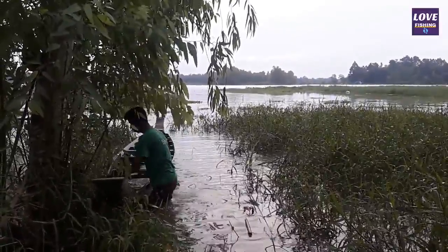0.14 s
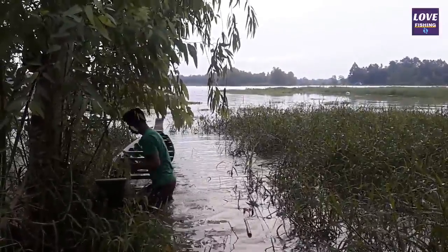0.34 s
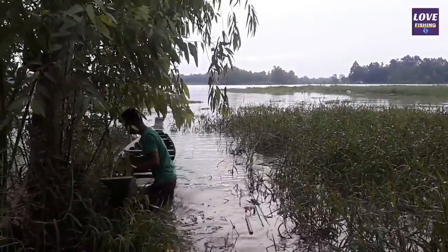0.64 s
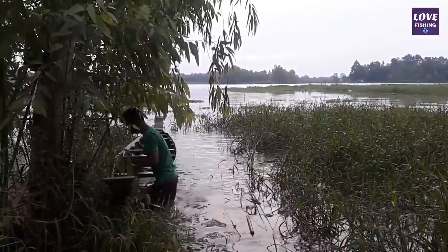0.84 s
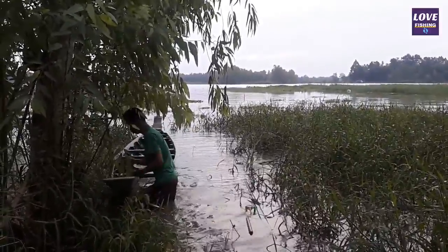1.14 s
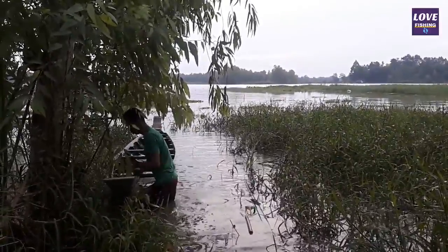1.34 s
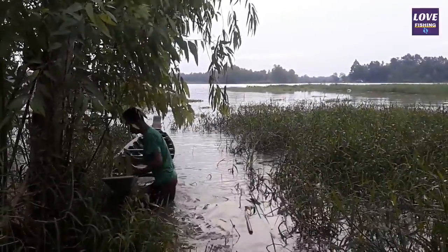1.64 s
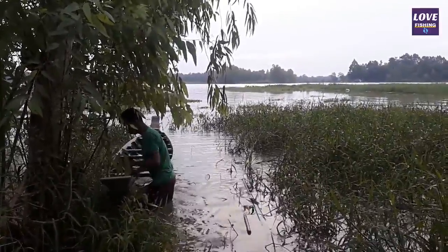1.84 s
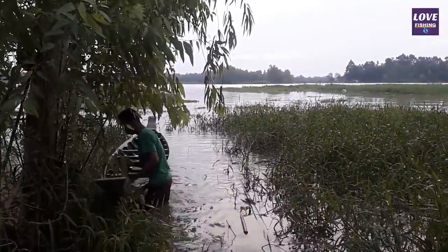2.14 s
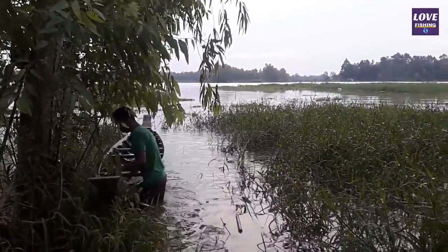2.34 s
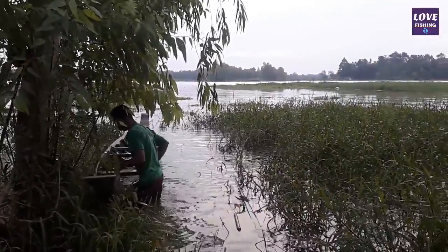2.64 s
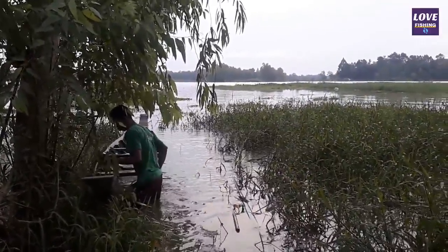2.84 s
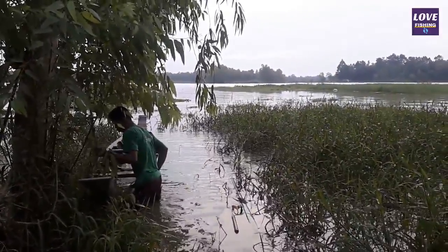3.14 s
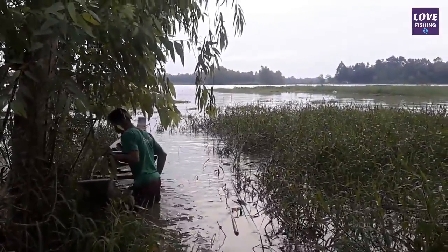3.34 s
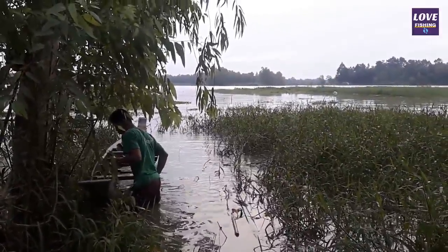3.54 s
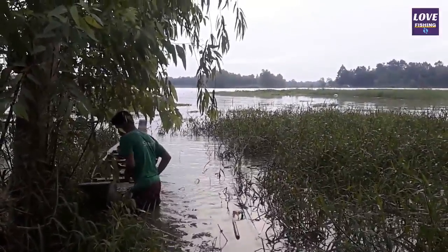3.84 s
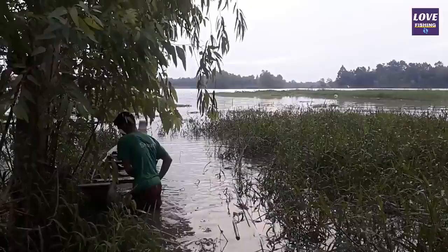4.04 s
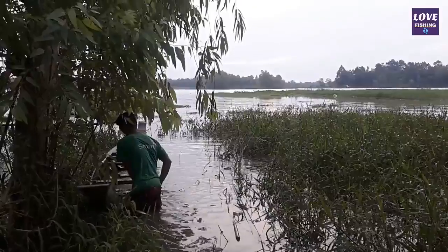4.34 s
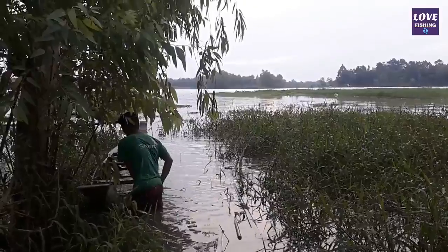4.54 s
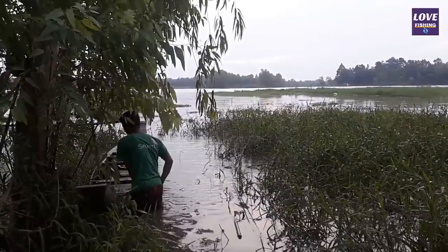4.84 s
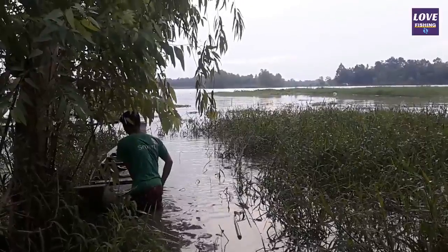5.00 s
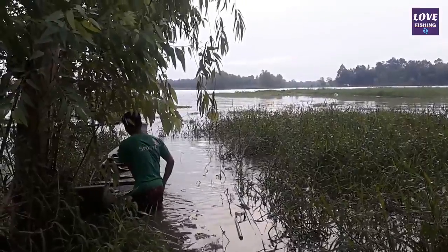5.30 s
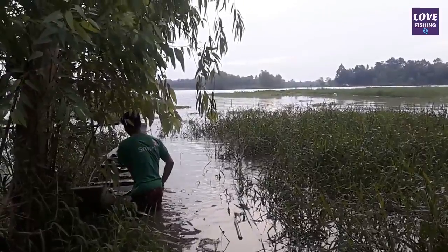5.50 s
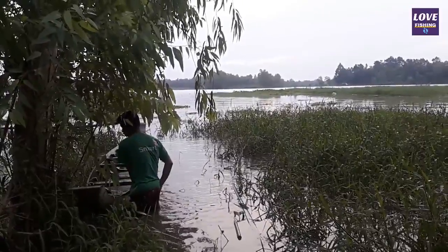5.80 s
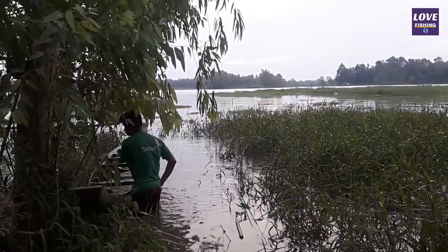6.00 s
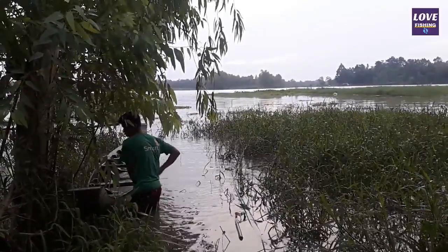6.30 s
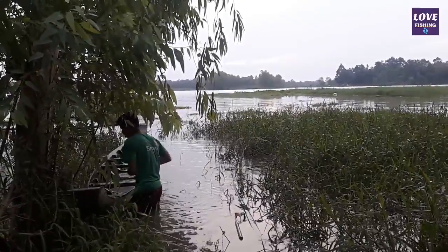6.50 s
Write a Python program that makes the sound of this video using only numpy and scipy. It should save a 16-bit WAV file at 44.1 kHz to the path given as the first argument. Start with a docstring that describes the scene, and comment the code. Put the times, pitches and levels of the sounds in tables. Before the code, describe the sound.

A few light plops and swishes open, then irregular woody knocks pile up quickly with thin metallic chain shimmer and low hull thuds. After a sparse gap, a second short clattering burst follows and dies. The rest is quiet: lake air, thin steady insect trill, small water movements, reed brushing and a few faint dull bumps. Open outdoor stereo with a very short tail from hull and bushes.

```python
'''Chained net lowered into a wooden boat

A man standing in a lake lowers what is probably a cast net into a wooden boat. Its sinkers knock, as blows
on resonances of boards and hull; its chain slides into a heap, as dense clicks through ringing steel links.
Filtered noise and sparse contacts make the net's rustle, the water, the reeds, the air and the insects in
the bank's bushes; climbing sines make drips, air pockets and the ring of light knocks. Hull and bushes
answer with a short noise tail.'''
import sys
import numpy as np
from scipy import signal
from scipy.fft import rfft, irfft, next_fast_len
from scipy.io import wavfile
from scipy.ndimage import uniform_filter1d, map_coordinates

SR = 44100
rng = np.random.default_rng(int(sys.argv[2]) if len(sys.argv) > 2 else 0)


def unload_wav(signal):
    """Save mono or channel-first audio to the path in sys.argv[1] as 16-bit WAV at rate SR, clipped to [-1, 1]."""
    wavfile.write(
        sys.argv[1],
        SR,
        np.round(np.clip(np.atleast_2d(signal).T, -1, 1) * 32767).astype(np.int16),
    )


N = 293706

# Pour of the chain over the boards. Each row: time in seconds, patter and hull rumble in relative dB.
POUR = [(0.0, -72, -72), (0.34, -66.5, -50.5), (0.39, -42.5, -43.5), (0.62, -51, -41), (0.75, -42, -36),
        (1.03, -47.5, -43.5), (1.16, -40.5, -42.5), (1.45, -39, -43.5), (1.7, -45.5, -49.5),
        (1.85, -37, -37), (2.201, -44, -61.5), (2.33, -39, -47.5), (2.58, -48, -46), (2.76, -65.5, -67),
        (3.45, -57, -53), (3.72, -39, -43), (3.911, -48.5, -56), (3.992, -67, -54), (4.15, -95, -81)]
# Resonances of the hull. Each row: centre in Hz, width in Hz, relative level in dB.
HULL_MODES = [(134, 360, -11), (324.8, 83, 1), (361.5, 88, 5.5), (437, 91, -5.5)]
# Lower resonances of the boards. Each row: centre in Hz, width in Hz, relative level in dB.
BOARD_MODES = [(619, 84, -4), (666, 56, 0.5), (748, 85, -3), (981, 148, -1.5), (1282, 150, -5),
               (1320, 100, -2), (1640, 230, -8.5)]
# Upper resonances of the boards. Each row: centre in Hz, width in Hz, relative level in dB.
SNAP_MODES = [(1922, 262, 0), (2514, 100, 2.5), (3020, 610, -3.5), (3304, 490, -3.5), (4247, 1300, -14)]
# Colour of the links' clicks. Each row: frequency in Hz, relative spectral density in dB.
CLICK_SPECTRUM = [(3000, -23.5), (5000, -18.5), (7500, -22), (9000, -16.5), (10500, -9.5), (11300, -15),
                  (12200, -19.5), (13200, -7.5), (14500, -0.5), (15100, -16.5), (15600, -0.5),
                  (16200, -31.5)]
# Left-right likeness of sound from the boat. Each row: frequency in Hz, correlation (-1 to 1).
BOAT_ALIKE = [(300, 1), (640, 1), (1000, 0.96), (2000, 0.085), (3000, 0.58), (6000, 0.085)]
# Left-right likeness of the air and the hum. Each row: frequency in Hz, correlation (-1 to 1).
AIR_ALIKE = [(60, 0.92), (150, 0.89), (380, 0.69), (950, -0.2), (2380, -0.16), (6000, 0.04), (15000, -0.1)]


def amp(db):
    """Decibels to gain."""
    return 10 ** (np.asarray(db) / 20)


def unit(x):
    """Scaled to rms 1."""
    return x / np.sqrt(np.mean(x ** 2) + 1e-20)


def along(points, hz):
    """Interpolates (Hz, value) points on a log-frequency axis."""
    f, v = np.transpose(points)
    return np.interp(np.log(hz + 1), np.log(f + 1), v)


def levels(rows):
    """One gain per sample for each dB column; -120 dB outside the rows."""
    s, *cols = np.transpose(rows)
    t = np.arange(N) / SR
    return [amp(np.interp(t, s, c, left=-120, right=-120)) for c in cols]


def wobble(rate):
    """A smooth random curve, rate knots a second."""
    knots = rng.standard_normal(int(N * rate / SR) + 4)
    return map_coordinates(knots, [np.arange(N) * rate / SR])


def pan(left_db):
    """Two channel gains of mean power 1, left over right by left_db."""
    return unit(amp([[left_db / 2], [-left_db / 2]]))


def filtered(x, response):
    """x times a complex response of frequency."""
    size = x.shape[-1]
    m = next_fast_len(size + SR // 40, real=True)
    return irfft(rfft(x, m) * response(np.fft.rfftfreq(m, 1 / SR)), m)[..., :size]


def ringing(x, modes):
    """x through parallel resonances of alternating sign."""
    def response(f):
        total = 0
        for k, (centre, width, db) in enumerate(modes):
            damping = 1j * f * width
            total = total + (-1) ** k * amp(db) * damping / (centre * centre - f * f + damping)
        return total
    return filtered(x, response)


def edge(x, hz, kind, order):
    """A causal Butterworth filter."""
    return signal.sosfilt(signal.butter(order, hz, kind, fs=SR, output="sos"), x)


def spread(pair, alike):
    """Two unrelated signals become left and right with the given likeness."""
    def mid_side(hz):
        turn = np.arccos(np.clip(along(alike, hz), -1, 1)) / 2
        return np.array([np.cos(turn), np.sin(turn)])
    mid, side = filtered(pair, mid_side)
    return np.array([mid + side, mid - side])


def coloured(x, spectrum):
    """x shaped by the given spectrum, at rms 1."""
    return unit(filtered(x, lambda hz: amp(along(spectrum, hz))))


def patchy(x, depth_db):
    """x with its colour shifting at random from moment to moment, at rms 1."""
    z = signal.stft(x, nperseg=512)[2]
    field = rng.standard_normal(z.shape[1:])
    field = uniform_filter1d(uniform_filter1d(field, 7, 0), 9, 1)
    return unit(signal.istft(z * amp(depth_db * unit(field)), nperseg=512)[1][:, :N])


def noise():
    """White noise, unrelated in the two channels."""
    return rng.standard_normal((2, N))


def contacts(rate, scatter_db):
    """Tiny impacts of uneven size at random moments, rate a second."""
    sizes_db = scatter_db * np.clip(rng.standard_normal(N), -2, 2)
    return noise() * (rng.random(N) < rate / SR) * amp(sizes_db)


def add(track, s, sound):
    """Mixes a sound in at s seconds."""
    part = track[:, max(round(s * SR), 0):][:, :sound.shape[1]]
    part += sound[:, :part.shape[1]]


def struck_at_random(modes, vary_db):
    """Each blow drives the modes with other strengths."""
    return np.array(modes) + rng.standard_normal((len(modes), 1)) * [0, 0, vary_db]


def air(level_db=-60.5):
    """The low, even rush of the open lake: noise with a slight slow swell."""
    # Each row: frequency in Hz, relative spectral density in dB.
    air_spectrum = [(20, -33), (45, -7), (75, -1), (130, 1.5), (280, -5.5), (410, -8), (540, -8.5),
                    (1000, -16.5), (2200, -19), (3800, -25.5), (5500, -30.5), (7500, -31), (9700, -28.5),
                    (15500, -35.5)]
    swell_db = 0.7 * wobble(4)
    rush = coloured(spread(noise(), AIR_ALIKE), air_spectrum)
    return amp(level_db + swell_db) * rush * pan(-1.5)


def insects(chirp_per_s=4.4, chirp_db=0.8, trill_per_s=31, trill_db=1):
    """Many far insects merge into one narrow noise band, pulsing slowly and trilling fast."""
    # Drone. Each row: time in seconds, level in dB.
    drone_levels = [(0, -61.5), (2.8, -59), (4.2, -61.5), (4.75, -64), (5.65, -62), (5.74, -56.5),
                    (5.83, -63.5), (6.66, -63)]
    # Each row: frequency in Hz, relative spectral density in dB.
    insect_spectrum = [(3800, -20), (4250, -9.5), (4500, 1), (4760, 6.5), (4950, -0.5), (5250, -12),
                       (6200, -57)]
    drone, = levels(drone_levels)
    beat = lambda per_s: np.sin(2 * np.pi * per_s * np.arange(N) / SR + wobble(0.99))
    shimmer_db = chirp_db * beat(chirp_per_s) + trill_db * beat(trill_per_s) + wobble(60)
    return drone * amp(shimmer_db) * coloured(noise(), insect_spectrum) * pan(-1.5)


def wading(lapping_db=-73, water_db=0, reeds_db=-2, sag_db_per_s=40, calm_t60_s=0.3):
    """Water laps, swishes round his legs and reeds brush past: contacts swelling with each movement."""
    # Movements. Each row: start, rise and length in seconds, water and reeds in relative dB.
    movements = [(0.033, 0.025, 0.18, -59, -57.5), (0.227, 0.025, 0.028, -55, -48.5),
                 (4.378, .025, 0.059, -86, -58), (4.42, .07, 0.14, -65.5, -63),
                 (4.884, 0.12, 0.49, -67, -64), (5.33, 0.074, 0.056, -73.5, -65),
                 (5.869, .05, 0.058, -60, -59), (5.975, .12, 0.13, -56.5, -60.5),
                 (6.104, .05, 0.19, -74.5, -60.5), (6.376, .025, 0.22, -58.5, -65),
                 (6.45, 0.055, 0.094, -74, -62)]
    # Water. Each row: frequency in Hz, relative spectral density in dB.
    water_spectrum = [(200, -21), (400, -41.5), (700, -3.5), (1300, -3.5), (2100, 1), (3300, -3.5),
                      (5000, -27.5), (9000, -38)]
    # Reeds. Each row: frequency in Hz, relative spectral density in dB.
    reed_spectrum = [(2500, -5), (4000, 6.5), (5600, 4.5), (7000, -5.5), (10000, -5), (15000, -19)]
    water, reeds = np.full(N, amp(lapping_db)), np.zeros(N)
    for s, rise, length, swish_db, brush_db in movements:
        t = np.maximum(np.arange(N) / SR - s, 0)
        calm_db = -60 * np.maximum(t - length, 0) / calm_t60_s
        move = np.minimum(t / rise, 1) * amp(-sag_db_per_s * t + calm_db)
        water = np.hypot(water, amp(swish_db) * move)
        reeds = np.hypot(reeds, amp(brush_db) * move)
    splashes = coloured(contacts(rate=2500, scatter_db=3), water_spectrum)
    lap = amp(2 * wobble(30)) * patchy(splashes, depth_db=4)
    brush = coloured(contacts(rate=9000, scatter_db=3), reed_spectrum)
    return amp(water_db) * water * lap + amp(reeds_db) * reeds * brush


def tumble(patter_db=-6, snap_db=-3, rumble_db=-9, soft_hz=5080):
    """Lighter links patter on the boards: random contacts excite board and hull resonances."""
    patter, rumble = levels(POUR)
    taps = spread(contacts(rate=600, scatter_db=3), BOAT_ALIKE)
    clack = unit(ringing(taps, BOARD_MODES))
    snap = amp(snap_db) * unit(ringing(taps, SNAP_MODES)) * pan(7.7)
    wood = edge(unit(clack + snap), soft_hz, "low", order=3)  # wet wood dulls the blows
    hull = unit(edge(ringing(taps, HULL_MODES), 82, "high", order=2)) * pan(-1.3)
    return amp(patter_db) * patter * wood + amp(rumble_db) * rumble * hull


def mesh(level_db=-56.5, follows=0.4, usual_pour_db=-46.5):
    """The wet net rustles as long as the chain pours; follows is dB of rustle per dB of pour."""
    # Each row: frequency in Hz, relative spectral density in dB.
    mesh_spectrum = [(3000, -6.5), (4500, 5.5), (7000, -1.5), (10500, -2.5), (12000, -4.5), (14500, 4.5),
                     (16000, -12)]
    patter, _ = levels(POUR)
    flow = (patter / amp(usual_pour_db)) ** follows * amp(2.5 * wobble(25))
    rustle = patchy(coloured(contacts(rate=4000, scatter_db=3), mesh_spectrum), depth_db=4)
    return amp(level_db) * flow * rustle * pan(-4)


def drips(pitch_hz, pitch_spread, level_db, count, scatter_db=3, life_cycles=25, climb=0.098):
    """Drops off the wet net each ring a small bubble, a climbing sine with t60 of life_cycles periods."""
    t = np.arange(SR // 12) / SR
    out = np.zeros((2, N))
    s, patter_db, _ = np.transpose(POUR)
    chance = np.clip(rng.standard_normal((count, 3)), -2, 2)
    for at, (size, strength, side) in zip(rng.uniform(s[0], s[-1], count), chance):
        hz = pitch_hz * np.exp(pitch_spread * size)
        age = t * hz / life_cycles
        db = np.interp(at, s, patter_db) + level_db + scatter_db * strength
        bubble = (1 - np.exp(-t * hz)) * np.sin(2 * np.pi * hz * t * (1 + climb * age))
        add(out, at, amp(db - 60 * age) * bubble * pan(2 * side))
    return out


def sinkers(light_per_s=34, light_db=-3.5, light_thud_db=-9, light_snap_db=-3, scatter_db=2):
    """Sinker contacts at listed times, some of them follow-up hops, and light, dull ones at jittered moments
    following the pour."""
    # Listed contacts of sinkers, strong and faint; some are the follow-up hops of a sinker listed just before.
    # Each row: time in seconds, board clack, upper-mode snap and hull thud in relative dB.
    listed = [(0.172, -50, -56, -52), (0.25, -42.5, -44, -69), (0.366, -35.5, -35, -39.5),
              (0.375, -36.5, -32, -47), (0.395, -50, -56, -39), (0.408, -35, -31, -53),
              (0.422, -37, -32, -39), (0.456, -40, -44, -36.5), (0.484, -38, -44, -38),
              (0.497, -51, -53, -42), (0.519, -48, -57, -48), (0.535, -43.5, -49, -39),
              (0.56, -57, -45, -54), (0.576, -46.5, -38, -37.5), (0.622, -53, -70, -44.5),
              (0.655, -36.5, -42, -39), (0.676, -40, -63, -42.5), (0.699, -42, -36, -46),
              (0.708, -34.5, -30.5, -36), (0.737, -53, -46, -34), (0.756, -33.5, -28, -42),
              (0.779, -46, -35, -34.5), (0.798, -31.5, -30, -35.5), (0.824, -37, -37, -42),
              (0.853, -40, -44, -52), (0.9, -35.5, -63, -36), (0.951, -34, -28, -40),
              (0.997, -34, -36, -46), (1.006, -40.5, -45.5, -36), (1.058, -39.5, -30.5, -41),
              (1.065, -27.5, -27.5, -38), (1.087, -36, -35, -54), (1.114, -42, -39.5, -39),
              (1.134, -41.5, -26, -53), (1.142, -19, -20.5, -59), (1.156, -43.5, -28, -42.5),
              (1.2, -48, -47, -35), (1.226, -30, -37.5, -48), (1.251, -49.5, -40.5, -36.5),
              (1.274, -30.5, -60, -32.5), (1.287, -28, -24, -63), (1.297, -23, -18, -41),
              (1.302, -22.5, -44, -46.5), (1.335, -46, -41.5, -42.5), (1.367, -45, -30.5, -42),
              (1.378, -31, -32.5, -62), (1.401, -32, -28.5, -44.5), (1.412, -35, -44, -38.5),
              (1.433, -27.5, -41.5, -47), (1.466, -33.5, -38, -43.0), (1.477, -37, -37.5, -52),
              (1.523, -31, -35.5, -31.0), (1.568, -27.5, -35.5, -34), (1.595, -27.5, -34.5, -62),
              (1.61, -29, -41.5, -71), (1.626, -34.5, -31.5, -41.5), (1.683, -34.5, -43.5, -56.5),
              (1.708, -40, -61, -45), (1.749, -53.5, -67, -42.5), (1.765, -40, -51.5, -39),
              (1.781, -35.5, -41.5, -42), (1.8, -31.5, -38, -45), (1.823, -24.5, -25, -36.5),
              (1.83, -15.5, -16.5, -47.5), (1.843, -42, -18, -36), (1.9, -39, -34.5, -49),
              (1.932, -33, -50.5, -36.5), (1.989, -37.5, -39, -37), (2.002, -28, -29, -52),
              (2.01, -26, -26, -60), (2.025, -32.5, -24.5, -53), (2.035, -42, -60, -37.5),
              (2.084, -30, -39, -34.5), (2.121, -29, -34, -42.5), (2.135, -28.5, -31.5, -45),
              (2.15, -39.5, -36.5, -45.5), (2.185, -40, -40.5, -33), (2.236, -22.5, -26, -30.5),
              (2.255, -25.5, -30.5, -37.5), (2.265, -27, -18, -38), (2.277, -18.5, -22, -49),
              (2.284, -40.5, -36, -61), (2.31, -40, -55, -51), (2.348, -38, -37, -66),
              (2.362, -31.5, -33, -50), (2.373, -30, -29.5, -44), (2.412, -46, -56, -43.5),
              (2.516, -39, -35, -52), (2.526, -36.5, -47, -67), (2.541, -29, -29, -68),
              (2.579, -37.5, -37, -66), (2.672, -33.5, -38.5, -50), (2.702, -52, -69, -64),
              (2.821, -50, -57, -67.5), (2.874, -56, -55, -63), (3.168, -53, -63, -67),
              (3.107, -39, -46, -51), (3.205, -46, -39.5, -52.5), (3.277, -41.5, -46, -49),
              (3.353, -34.5, -40, -60), (3.38, -37, -40, -53), (3.399, -48, -50, -62),
              (3.434, -67, -65, -62), (3.484, -40, -52.5, -56), (3.51, -58, -77, -57),
              (3.534, -35, -49, -53), (3.567, -30, -33, -41), (3.59, -33.5, -55, -44.5),
              (3.598, -32.5, -41, -75), (3.651, -37, -41, -76), (3.682, -26, -31, -46),
              (3.691, -22, -22.5, -46), (3.725, -35.5, -30, -55), (3.748, -25.5, -25, -40),
              (3.78, -33, -55, -45), (3.857, -35, -47, -57.5), (3.902, -43.5, -44.5, -68),
              (3.928, -42, -47.5, -68), (4.063, -52.5, -59, -58.5), (4.755, -70.0, -75, -65),
              (4.998, -57, -74, -55.5), (5.03, -62, -74, -58), (6.4, -54, -65, -51.5),
              (6.481, -72, -64, -58)]
    s, patter_db, rumble_db = np.transpose(POUR)
    chance = rng.standard_normal((200, 3))
    at = s[0] + (np.arange(len(chance)) + 0.35 * chance[:, 0]) / light_per_s
    clack = np.interp(at, s, patter_db) + light_db + scatter_db * chance[:, 1]
    thud = np.interp(at, s, rumble_db) + light_thud_db + scatter_db * chance[:, 2]
    light = np.transpose([at, clack, clack + light_snap_db, thud])
    return np.vstack([listed, light[(at > s[0]) & (at < s[-1])]])


def at_another_spot(modes, pitch_scatter=0.027):
    """Every spot on the boat has its own mix and tuning of the modes."""
    spot = struck_at_random(modes, vary_db=2.5)
    return spot * np.exp(rng.standard_normal((len(spot), 1)) * [pitch_scatter, 0, 0])


def knocks(strike=5.47, contact_t60_s=0.0026, chatter=0.63, chatter_t60_s=0.052, thud_db=0.0,
           board_db=-2.0, snap_trim_db=-1.0, shake=0.085):
    """Each sinker strikes, hops once and chatters on the boards; its weight pushes the hull."""
    usual_db = -27  # clack of an ordinary sinker
    strike_grows, chatter_grows = 0.97, 0.0171  # dB of strike, log of chatter t60, per dB above usual
    bounce_s, bounce_db = 0.008, -18
    shake_t60_s = 0.089  # the shaking of the hull fades a little slower than the chatter
    tilt_per_db, tilt_pivot_hz = 0.83, 2500  # dB per octave for each dB of snap over clack
    snap_top_hz = 4540  # a lead sinker is soft
    hull_low_hz, hull_top_hz = 274, 750  # small and heavy: little bass, slow to follow
    hull_pitch_scatter = 0.035
    t = np.arange(SR // 12) / SR
    out = np.zeros((2, N))
    early = lambda x, size: x / np.sqrt(np.mean(x[:, :size] ** 2))  # rms 1 over the first samples
    struck = lambda blow, modes: ringing(blow, at_another_spot(modes))
    first = np.arange(len(t)) == SR // 1000
    for s, db, snap_db, hull_db in sinkers():
        excess_db = max(db - usual_db, 0)
        linger_s = chatter_t60_s * np.exp(chatter_grows * excess_db)
        again = t - bounce_s * rng.uniform(0.7, 1.4)
        bounce = (again > 0) * amp(bounce_db - 60 * np.abs(again) / contact_t60_s)
        force = amp(-60 * t / contact_t60_s) + bounce + chatter * amp(-60 * t / linger_s)
        grit = unit(rng.standard_normal((2, len(t))) * (rng.random(len(t)) < 0.12))
        rattle = spread(force * grit, BOAT_ALIKE)
        blow = strike * amp(strike_grows * excess_db) * first + rattle

        boards = amp(db + board_db) * early(struck(blow, BOARD_MODES), size=309) * pan(0.24)

        # a snappier blow is also brighter
        tilt = tilt_per_db * np.clip(snap_db - db, -8, 8)
        upper = [(hz, width, level + tilt * np.log2(hz / tilt_pivot_hz)) for hz, width, level in SNAP_MODES]
        snap = early(edge(struck(blow, upper), snap_top_hz, "low", order=4), size=309)
        snap = amp(snap_db + snap_trim_db) * snap * pan(3.4)

        push = strike * first + shake * rattle * amp(-60 * t / shake_t60_s)
        spot = np.array(HULL_MODES) * [np.exp(hull_pitch_scatter * rng.standard_normal()), 1, 1]
        thud = edge(struck(push, spot), [hull_low_hz, hull_top_hz], "band", order=2)
        thud = amp(hull_db + thud_db) * early(thud, size=530) * pan(-1.7)
        add(out, s, boards + snap + thud)
    return edge(out, 7000, "low", order=2)


def plops(rise=0.15, attack_s=0.0035):
    """Short decaying sines, climbing slightly: drips, air pockets and the ring of light knocks."""
    # Each row: start in seconds, starting pitch in Hz, level in dB, t60 in seconds.
    tones = [(.038, 1380, -45, 0.027), (.08, 1230, -54, 0.086), (0.1, 1680, -40, 0.056),
             (0.14, 984, -49, 0.05), (.153, 880, -43, 0.047), (2.59, 133, -41, 0.064),
             (2.627, 124, -44, 0.16), (2.821, 1020, -39, 0.028), (2.875, 960, -52, .04),
             (2.919, 1390, -41, 0.026), (2.979, 1930, -42, .03), (3.06, 2360, -40, 0.023),
             (3.17, 914, -43, 0.028), (3.21, 800, -41, 0.15), (3.215, 250, -36.5, 0.062),
             (3.438, 260.5, -44, 0.055), (3.484, 236, -37, 0.063), (3.549, 246, -39.5, 0.085),
             (4.756, 111, -62, .15), (4.76, 287, -54, .06), (4.998, 698, -52, 0.088),
             (5.01, 449, -48.5, .16), (6.392, 386, -45.5, 0.17), (6.405, 457, -49, 0.086),
             (6.48, 336, -50, 0.073)]
    t = np.arange(SR // 5) / SR
    out = np.zeros((2, N))
    for s, hz, db, t60 in tones:
        phase = 2 * np.pi * hz * (t + rise * t * t / t60)
        envelope = amp(db - 60 * t / t60) * (1 - np.exp(-t / attack_s))
        add(out, s, envelope * np.sin(phase) * pan(-1))
    return out


def from_left(x):
    """Sound from the boat reaches the left before the right, as a phase lead."""
    # Each row: frequency in Hz, lead of left over right in radians.
    boat_lead = [(250, 0.25), (690, 1.1), (1400, 1.34), (2070, 3.15), (2580, 0.33), (3600, 4.74), (5000, 1)]
    sides = np.array([[1], [-1]])
    return filtered(x, lambda hz: np.exp(0.5j * along(boat_lead, hz) * sides))


def bank(x):
    """Hull and bushes scatter the sound into a decaying noise tail, 5 ms late."""
    # Each row: frequency in Hz, t60 in seconds.
    bank_t60 = [(200, 0.17), (700, 0.16), (2000, 0.15), (6000, 0.17), (15000, 0.014)]
    scatter = spread(rng.standard_normal((2, SR // 2)), BOAT_ALIKE)
    hz, t, z = signal.stft(scatter, SR, nperseg=256)
    decay = amp(-60 * t / along(bank_t60, hz)[:, None])
    tail = signal.istft(z * decay, SR, nperseg=256)[1]
    late = np.pad(x, ((0, 0), (SR // 200, 0)))
    return signal.fftconvolve(late, tail / np.linalg.norm(tail[0]), axes=1)[:, :N]


def flows(t):
    """How links move: a slide swells, falls and settles; a dropped bunch clashes at once."""
    # Slides onto the heap. Each row: start in seconds, relative level in dB, rise in seconds.
    slides = [(0.372, -48, 0.003), (0.505, -47, 0.0026), (0.575, -41.5, 0.0018), (0.697, -37.5, 0.0005),
              (0.755, -42, 0.0019), (0.838, -35, 0.018), (1.058, -32.5, 0.032), (1.148, -35, 0.013),
              (1.239, -41, 0.0055), (1.291, -37, 0.035), (1.408, -41.5, 0.0074), (1.476, -45, 0.00075),
              (1.519, -41.5, 0.033), (1.577, -31, 0.038), (1.825, -26, 0.019), (1.896, -31, 0.013),
              (2.01, -32, 0.021), (2.107, -32.5, 0.011), (2.245, -34, 0.033), (2.342, -33.5, 0.0023),
              (2.457, -39.5, .001), (2.501, -29.5, 0.038), (2.837, -45.5, 0.0025), (2.997, -41.5, 0.0054),
              (3.033, -29, 0.0013), (3.062, -30.5, 0.0023), (3.219, -42.5, 0.00091), (3.3, -54, .002),
              (3.548, -44, 0.0017), (3.565, -34, 0.03), (3.641, -34, 0.011), (3.681, -24, 0.015),
              (3.737, -23.5, 0.014), (3.896, -43.5, 0.0034), (4.07, -63, .004)]
    # Dropped bunches. Each row: start in seconds, relative level in dB.
    bunches = [(1.059, -35), (1.477, -29), (1.604, -27), (1.803, -30.5), (2.258, -28), (3.035, -22.5),
               (3.0626, -27), (3.683, -30), (3.745, -19)]
    fall_t60_s, fall_per_rise = 0.17, 4.7  # a slow length also takes longer to land
    settle_db, settle_t60_s = 0, 0.27
    clash_t60_s = 0.037
    for s, db, rise in slides:
        after = np.maximum(t - rise, 0)
        fall = amp(-60 * after / (fall_t60_s + fall_per_rise * rise))
        settle = amp(settle_db - 60 * after / settle_t60_s)
        yield s, np.minimum(t / rise, 1) * amp(db) * np.hypot(fall, settle)
    for s, db in bunches:
        yield s, amp(db - 60 * t / clash_t60_s)


def loose_links(width_hz, count):
    """Modes of randomly struck links, denser toward the top: Hz, width in Hz, dB."""
    low_hz, high_hz = 9000, 15500
    hz = low_hz + np.sqrt(rng.random(count)) * (high_hz - low_hz)
    return struck_at_random([(f, width_hz, along(CLICK_SPECTRUM, f)) for f in hz], vary_db=4)


def chain(ring_db=-4.0, loose_db=-4.0, click_db=-7.0, change_s=2.6, clash=0.97):
    """Links collide densely: a wash of clicks under the ringing of small steel rings."""
    # Strongest links at first. Each row: centre in Hz, width in Hz, relative level in dB.
    first_links = [(11820, 62, 4.5), (11800, 67, 1), (13460, 140, 19), (12370, 75, -4.5), (13550, 200, -10),
                   (14000, 54, 22), (14500, 130, -4)]
    # Strongest links from change_s on. Each row: centre in Hz, width in Hz, relative level in dB.
    last_links = [(10350, 170, -18), (12700, 71, -1.5), (13200, 56, 1), (13270, 50, 15), (14100, 110, 18),
                  (14300, 160, 17.5), (15450, 150, 1)]
    t = np.arange(SR // 2) / SR
    out = np.zeros((2, N))
    clumps = lambda: amp(np.interp(t, np.linspace(0, 0.5, 40), 3.5 * rng.standard_normal(40)))
    for s, flow in flows(t):
        push = flow * (1 + clash * np.exp(-t / 0.007))  # an abrupt drop begins with one clash
        hits = push * rng.standard_normal((2, len(t))) * (rng.random(len(t)) < 0.1)
        # other links come to the top as the heap grows
        strong = struck_at_random(first_links if s < change_s else last_links, vary_db=4)
        # three groups fall in clumps, each with its own notes
        loose = sum(ringing(hits * clumps(), loose_links(width_hz=28, count=6)) for _ in range(3))
        rings = amp(ring_db) * unit(ringing(hits * clumps(), strong)) + amp(loose_db) * unit(loose)
        clicks = amp(click_db) * coloured(hits, CLICK_SPECTRUM)
        jingle = edge(rings, 9860, "high", order=4) + clicks
        add(out, s, np.sqrt(np.mean(flow ** 2)) * jingle)
    return out * pan(-7.0)


def clinks(rattle_t60_s=0.088):
    """A larger steel ring is struck and rebounds: decaying noise drives its modes."""
    # Strikes. Each row: start in seconds, level in dB over the first 10 ms.
    strikes = [(.844, -34.5), (0.864, -40)]
    # Ring. Each row: centre in Hz, width in Hz, relative level in dB.
    ring_modes = [(4524, 83, 7.5), (5260, 140, -14), (12100, 82, 7), (15100, 220, 4)]
    t = np.arange(SR // 8) / SR
    out = np.zeros((2, N))
    for s, db in strikes:
        rattle = amp(-60 * t / rattle_t60_s) * rng.standard_normal((2, len(t)))
        ring = ringing(rattle, ring_modes)
        ring = ring / np.sqrt(np.mean(ring[:, :SR // 100] ** 2))
        add(out, s, amp(db) * ring * pan(-1.5))
    return out


def hum():
    """A faint hollow hum over the quiet water: noise through two narrow resonances."""
    # Each row: time in seconds, level in dB.
    hum_levels = [(4.3, -81), (5.1, -63.5), (5.4, -74.5), (5.8, -68.5), (6.66, -76.5)]
    # Each row: centre in Hz, width in Hz, relative level in dB.
    hollow_modes = [(391.3, 9.4, 1.5), (442, 19, -5.5)]
    level, = levels(hum_levels)
    return level * unit(ringing(spread(noise(), AIR_ALIKE), hollow_modes))


def scene():
    """Boat, chain and net before the sounds of the lake."""
    water = drips(1371, 0.406, level_db=2.5, count=480)
    water = water + drips(640, 0.284, level_db=3, count=150)  # fatter drops into the bilge
    near = from_left(knocks() + tumble() + plops() + water)
    net = chain() + clinks() + mesh()
    lake = wading() + hum() + insects() + air()
    return near + amp(-11.5) * bank(near) + net + lake


def record(dry):
    """A steep band limit at 15850 Hz."""
    return filtered(dry, lambda hz: 1 / (1 + (hz / 15850) ** 300))


dry = scene()
out = record(dry)
unload_wav(out)
```